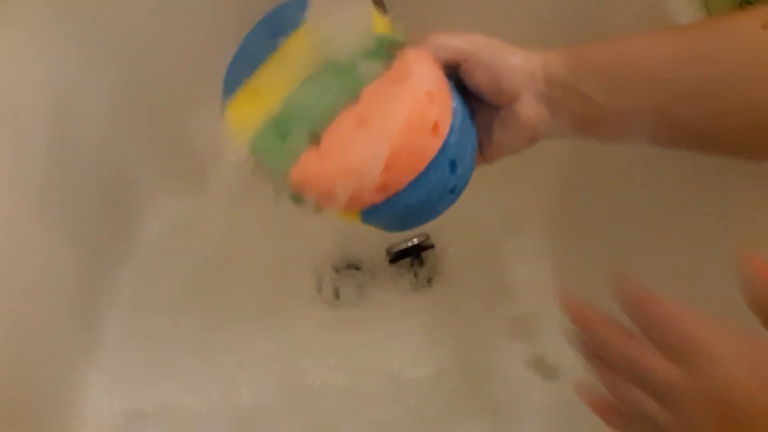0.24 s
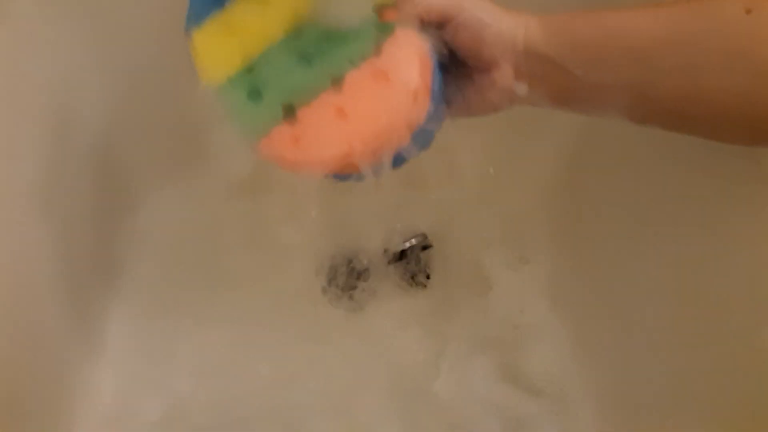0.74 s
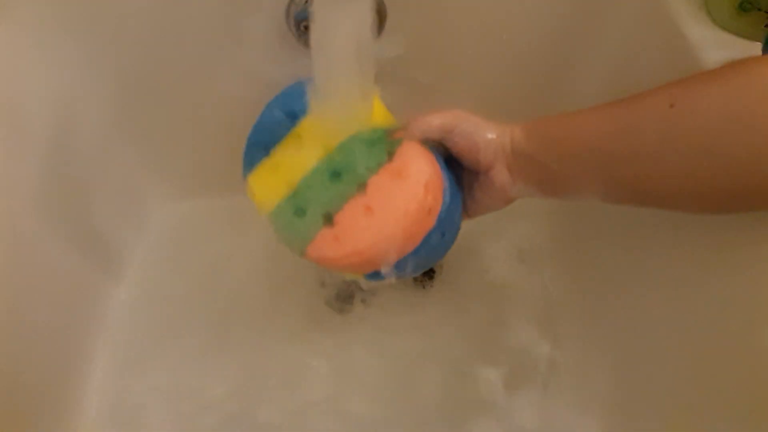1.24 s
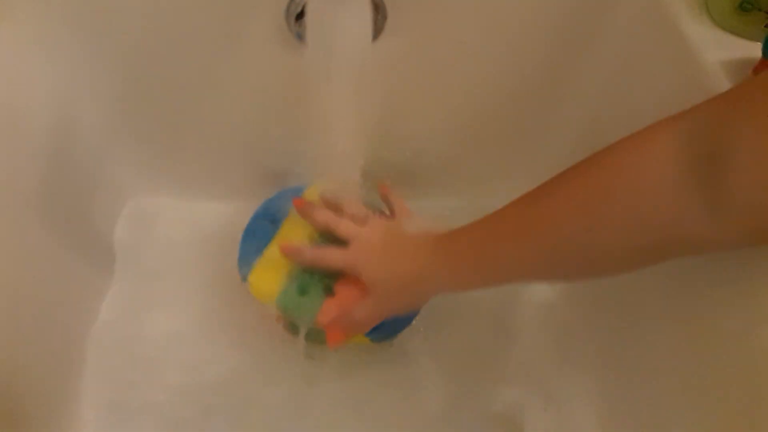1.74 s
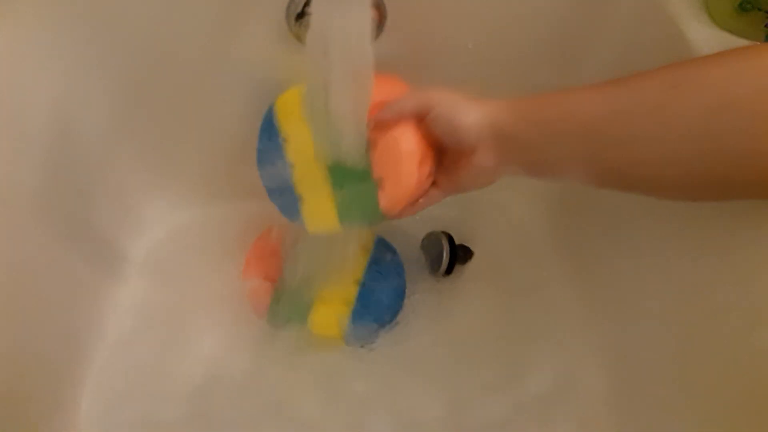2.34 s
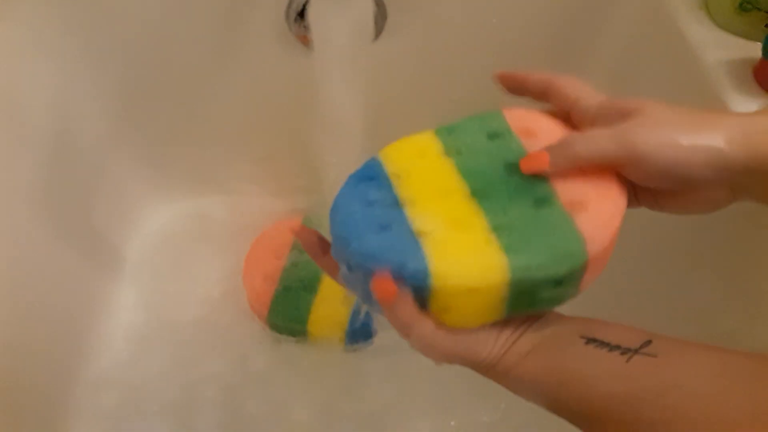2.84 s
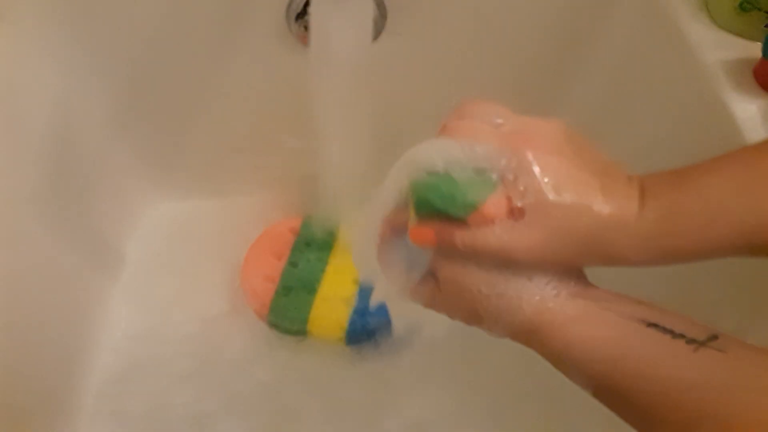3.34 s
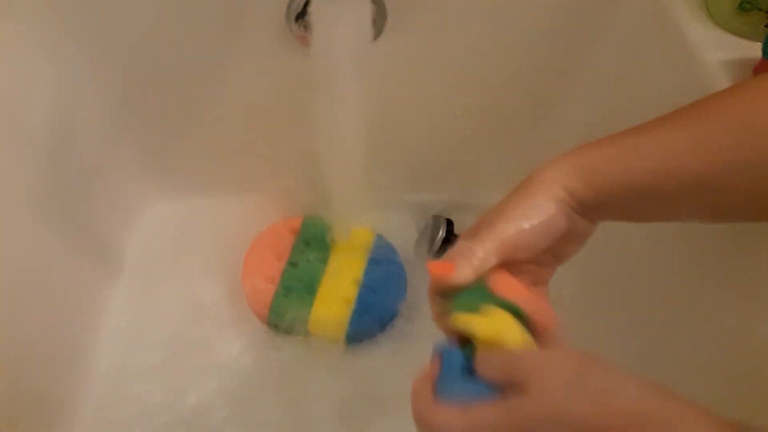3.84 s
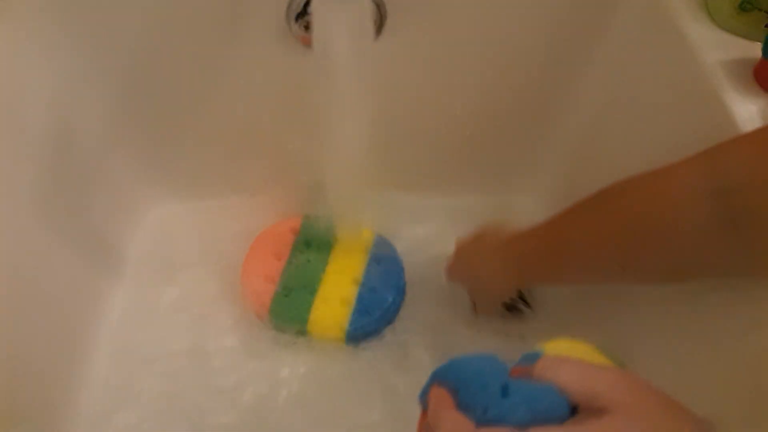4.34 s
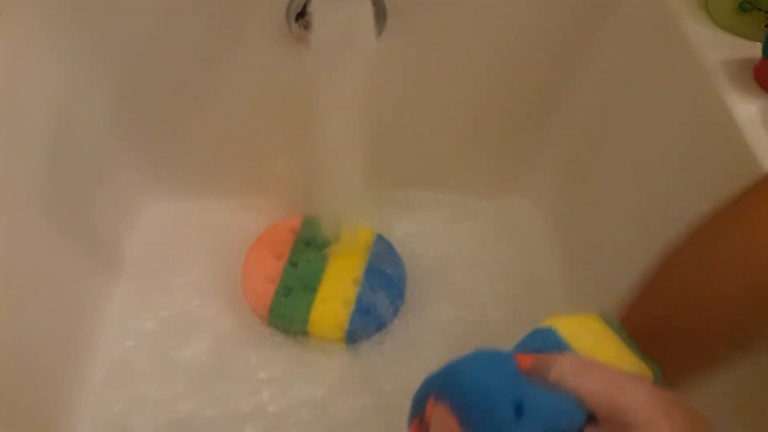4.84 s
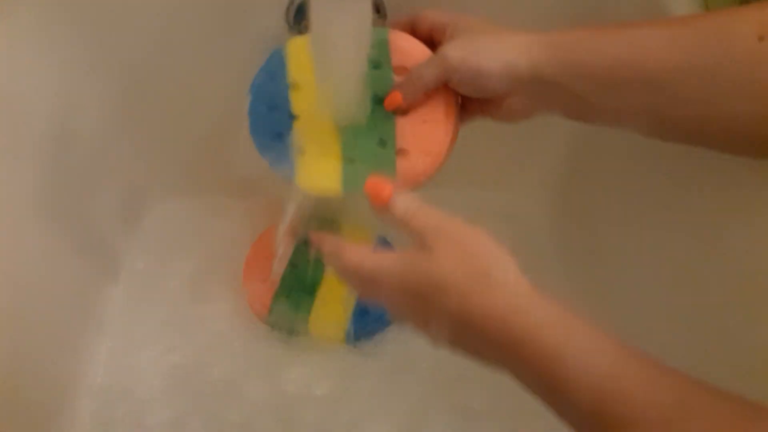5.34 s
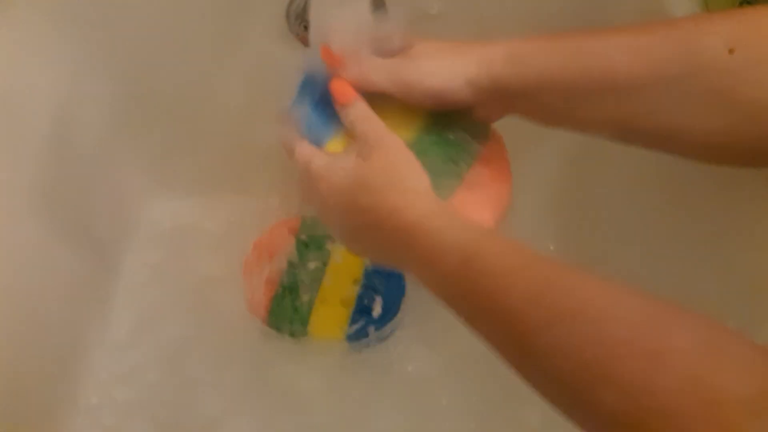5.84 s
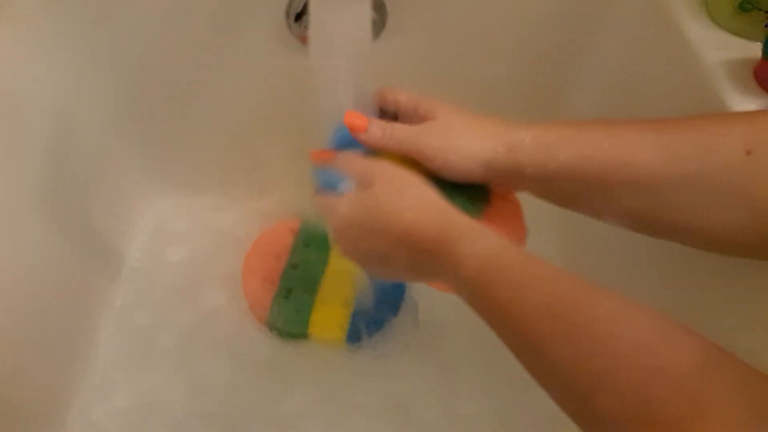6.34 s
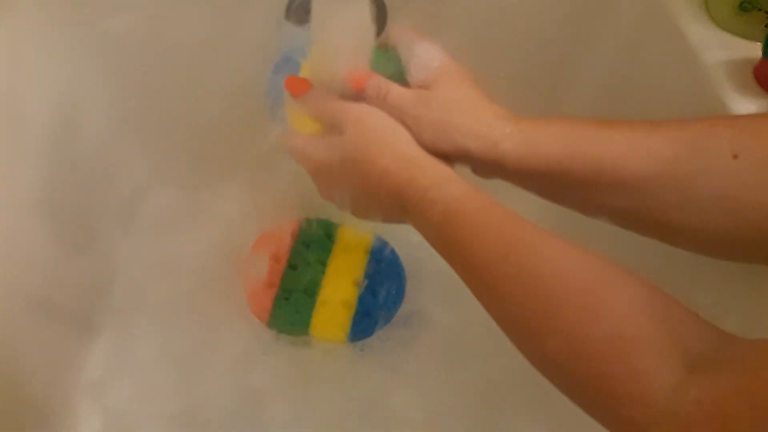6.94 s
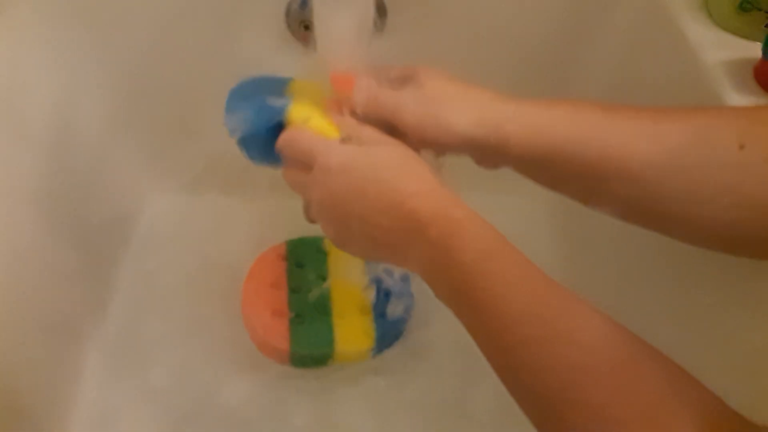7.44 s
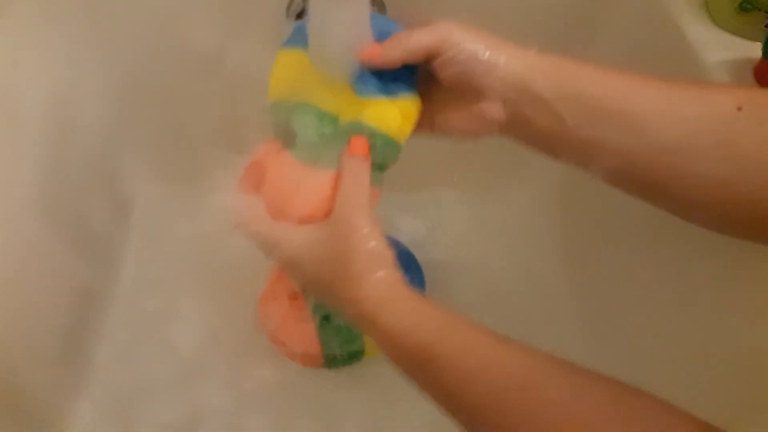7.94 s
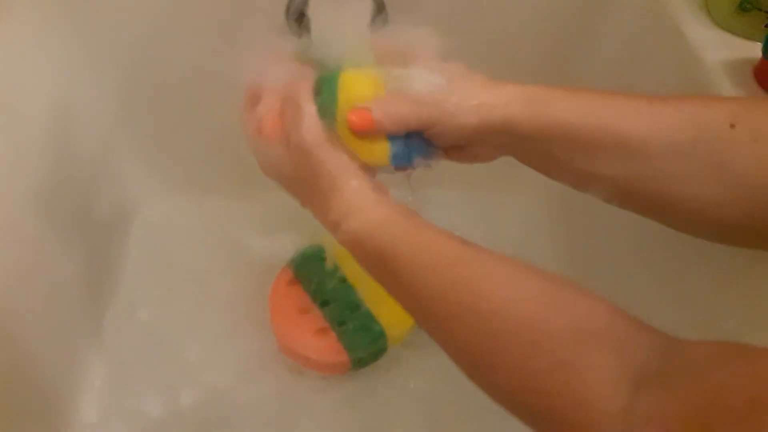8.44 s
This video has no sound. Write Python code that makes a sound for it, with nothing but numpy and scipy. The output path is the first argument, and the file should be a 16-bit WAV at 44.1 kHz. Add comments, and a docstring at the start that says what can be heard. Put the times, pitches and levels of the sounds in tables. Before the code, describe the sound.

Water runs from a tap into a bathtub, spattering over hands and squeezed sponges in a small bathroom; something knocks once against the tub.

```python
"""A running bath tap: turbulence excites the resonances of the spout, and the jet drives the modes of
the shallow-filled tub. Hands turn and squeeze sponges under the jet, so spray (droplet impacts) and
gurgle (oscillating bubbles) come and go. Once something hard, like a drain stopper, strikes the tub
and rebounds. The small hard-walled bathroom reverberates."""
import sys
import numpy as np
from scipy import signal
from scipy.fft import rfft, irfft, next_fast_len
from scipy.io import wavfile
from scipy.ndimage import uniform_filter1d, map_coordinates

SR = 44100
rng = np.random.default_rng(int(sys.argv[2]) if len(sys.argv) > 2 else 0)


def write(x):
    x = np.atleast_2d(x).T
    wavfile.write(sys.argv[1], SR, np.round(np.clip(x, -1, 1) * 32767).astype(np.int16))


N = 383669


# loudness of the running tap, which ducks after the knock and then recovers: t/s, level/dB
TAP_LEVEL = [(0.0, -26.5), (0.4, -27), (1.7, -26.5), (2.0, -27), (3.2, -26.5), (4.1, -27.5), (4.7, -27.0),
             (5.0, -30), (5.4, -29.5), (7.1, -26.5), (7.2, -28), (7.4, -24.5), (7.5, -26.5), (7.8, -25.5),
             (8.1, -26.5), (8.7, -26)]
# spout resonances: f/Hz, bandwidth/Hz, level/dB
SPOUT_MODES = [(786, 21, -12), (870, 32, -5), (994, 22, -8.5), (1086, 14.4, 2.1), (1150, 15, -9),
               (1172.3, 16.7, 4), (1204, 13, 3.5), (1253, 14, -5.5), (1251, 11, 3), (1326, 23, -7),
               (1390, 65, -15.5), (1904, 14, -8.5), (2120, 100, -31.5)]
# continuum beneath them: f/Hz, level/dB
SPOUT_FLOOR = [(20, -60), (400, -40), (1500, -16), (2500, -31.5), (5000, -32), (16000, -70)]
def spout(tap_db):
    """Resonance: the turbulent, sputtering flow sings at the natural frequencies of the spout."""
    sputter = amp(1.6 * wobble(50))
    return amp(tap_db + 1.23 + 1.03 * wobble(8)) * sputter * resonant(SPOUT_MODES, SPOUT_FLOOR)


# upper spout resonances: f/Hz, bandwidth/Hz, level/dB
HISS_MODES = [(3331, 45, 5.5), (3564, 47, 0.5), (3640, 28, -13), (3780, 54, 3), (4040, 40, -4.5),
              (4470, 88, -3), (4660, 61, -1.5), (6290, 28, 1)]
# rush of the aerated jet: f/Hz, level/dB
RUSH = [(20, -60), (1000, -29), (2000, -13.5), (2500, -12), (3200, -5.5), (4200, -7.5), (5100, -7.5),
        (6600, -9), (7700, -14), (11000, -21.5), (16000, -18.5)]
def hiss(tap_db, break_db):
    """Turbulent noise: the hiss follows the tap's loudness and weakens as the jet spills or soaks in."""
    lost_db = 0.32 * np.maximum(break_db, 0) + 0.67 * np.maximum(-break_db, 0)
    gain = amp(tap_db + 2.5 - lost_db + 0.71 * wobble(20))
    return gain * patchy(resonant(HISS_MODES, RUSH), depth_db=2.23)


# loudness of the tub's low drumming, ducking for a moment after the knock: t/s, level/dB
DRUM_LEVEL = [(0.0, -33), (0.4, -35.5), (0.6, -33.5), (0.8, -35.0), (3.4, -34.5), (4.4, -37.5),
              (4.5, -33.5), (4.6, -37.5), (5.0, -36.0), (5.2, -38.5), (5.3, -36.5), (5.8, -38.5),
              (6.5, -36), (8.7, -34.5)]
# modes of the shell and its hollow: f/Hz, bandwidth/Hz, level/dB
TUB_MODES = [(66, 16, -25), (107, 12, -31), (154.7, 5.9, -7), (169.6, 10.8, -7), (206, 12, -11),
             (231, 5.5, -4.5), (263.6, 6.3, 4.5), (281, 18, -5.5), (312.4, 8.8, -0.5), (323, 10, -5),
             (428, 30, -6.5), (499, 12, -12), (542, 15, -5), (597, 18, -5.5), (688, 12.3, -6.5)]
# continuum beneath them: f/Hz, level/dB
TUB_FLOOR = [(20, -35), (100, -44), (200, -24), (500, -43), (900, -19), (2000, -58), (16000, -90)]
def drumming():
    """Forced vibration: the jet drives the modes of the tub with a random force."""
    return amp(curve(DRUM_LEVEL) + 2.5 + 0.86 * wobble(22)) * resonant(TUB_MODES, TUB_FLOOR)


# the jet slips off the sponge onto hands and pool: t/s, duration/s, spray rise/dB
SPILLS = [(0.55, 0.073, 3), (1.05, 0.34, 3), (1.53, 0.16, 6.5), (1.74, 0.53, 6), (2.39, 0.2, 4.5),
          (2.82, 2.514, 7), (6.18, 0.4, 5.5), (7.11, 0.028, 6.5), (8.25, 0.045, 5)]
# the sponge swallows the jet: t/s, duration/s, spray fall/dB
SOAKS = [(1.46, 0.034, 2.5), (2.69, 0.086, 1.5), (5.36, 0.15, 2.5), (5.7, 0.4, 1.5), (7.6, 0.091, 3)]
def break_up():
    """Jet break-up: the spray level in dB relative to a jet running over the sponge."""
    def moves(rows):
        return sum(db * gesture(s, length, attack=.02, release=.037) for s, length, db in rows)
    return moves(SPILLS) - moves(SOAKS)


# spectrum of droplet impacts: f/Hz, level/dB
FIZZ = [(55, -53), (100, -11), (170, -17), (700, -23), (1500, -24.5), (2500, -8), (3400, -3.5), (5100, -5),
        (6600, -0.5), (7200, -3.5), (7700, -8.5), (12100, -7), (12800, -11), (16000, -16)]
def spray(spray_db):
    """Impact and air entrainment: droplets click in bursts, and many trap a pinging bubble."""
    clicks = (rng.random((2, N)) < 9000 / SR) * rng.standard_normal((2, N))
    patter = unit(clicks) * bursts(rate=420, spread_db=4.2, t60=.036) * amp(spray_db + 7)
    patter = scattered(patter, tub_db=-6, room_db=-1, tub_t60=.015, room_t60=0.25)
    patter = patchy(patter, depth_db=1.6)
    pings = np.array([bubbles(rate=450, band_hz=(3500, 15000), cycles=13, spread_db=3.6, samples=650)
                      for channel in range(2)])
    return stereo(filtered(patter + pings * amp(spray_db - 3), lambda hz: amp(along(FIZZ, hz) + 1.5)))


def ticks(spray_db):
    """Direct sound: nearby drops land as dry, heavily damped ticks."""
    pair = np.array([bubbles(rate=90, band_hz=(5000, 14000), cycles=2.5, spread_db=3, samples=200)
                     for channel in range(2)])
    return stereo(pair * amp(spray_db - 14))


# water pressed from a sponge: t/s, duration/s, large-bubble level/dB, small-bubble level/dB
SQUEEZES = [(-0.05, 0.11, -28, -30), (0.218, 0.46, -34.5, -30.5), (0.997, 0.59, -30.5, -35.5),
            (1.9, 0.21, -32.5, -42), (2.5, 0.2, -48, -34), (3.113, 0.38, -36, -36), (4.52, 0.36, -63, -37),
            (6.038, 0.082, -33, -28.5), (6.836, 0.037, -33, -27.5), (7.114, 0.47, -31.5, -32),
            (7.72, 0.089, -32.5, -44), (8.415, 0.18, -29.5, -33)]
def gurgle():
    """Bubble resonance: jet and runoff drive air into the pool; larger bubbles ring lower."""
    large = runoff([(s, length, db) for s, length, db, _ in SQUEEZES], churn_db=-41.5)
    small = runoff([(s, length, db) for s, length, _, db in SQUEEZES], churn_db=-33.5)
    large *= bubbles(rate=450, band_hz=(334, 932), cycles=4.34, spread_db=2.5, samples=1700)
    small *= bubbles(rate=1100, band_hz=(1693, 3480), cycles=4.4, spread_db=5, samples=450)
    return amp(-3) * bathroom(large + small, tub_db=-2, room_db=-3.5)


def runoff(squeezes, churn_db):
    """Incoherent addition: the jet's churning and each squeeze sum in power to a bubble cloud's gain."""
    swells = sum((amp(db) * gesture(s, length, attack=.024, release=.14)) ** 2
                 for s, length, db in squeezes)
    return np.sqrt(amp(2 * churn_db) + swells) * amp(0.8 * wobble(12))


# air pockets: t/s, level/dB, f/Hz
PLOPS = [(0.084, -13, 696), (1.358, -14, 522), (7.444, -14, 504), (8.595, -12, 770)]
def plops():
    """Damped pulsation: air pockets close under the hands and ring dully."""
    track, t = np.zeros(N), np.arange(SR // 8) / SR
    for s, db, hz in PLOPS:
        add(track, s, amp(db - 1.5) * bubble(t, hz, cycles=3))
    return track


# the fattest drops: t/s, level/dB, f/Hz
SPLATS = [(0.2542, -7, 2550), (1.5224, -7, 3800), (1.8247, -2, 4620), (2.0666, -4, 3840), (3.1727, 1, 6660),
          (3.9289, -0.5, 4600), (4.0965, 0, 6600), (4.972, -2, 3840), (5.0454, -4, 4430),
          (5.8295, -3.5, 6000), (6.4087, -3, 4800), (6.5756, 0, 4300)]
def splats(spray_db):
    """Impact transients: each drop slaps, rings briefly and leaves three pinging bubbles."""
    track, t = np.zeros(N), np.arange(SR // 8) / SR
    for s, db, hz in list(SPLATS) + lesser_drops(spray_db):
        slap = .35 * np.gradient(rng.standard_normal(len(t))) * amp(-60 * t / .012)
        add(track, s, amp(db - 3) * (bubble(t, hz, cycles=3) + slap))
        for delay, detune in rng.random((3, 2)):
            add(track, s + .01 * delay, amp(db - 11) * bubble(t, hz * 2 ** (detune - .5), cycles=5.9))
    return track


def lesser_drops(spray_db, rate=3.5, low_hz=4530, high_hz=11200, spread_db=5):
    """Random arrivals: drops scale with the spray that throws them; rows of t/s, level/dB, f/Hz."""
    when, size, pitch = rng.random((int(rate * N / SR), 3)).T
    db = spray_db[(when * N).astype(int)] + 19.5 + spread_db * (2 * size - 1)
    return list(zip(when * N / SR, db, low_hz * (high_hz / low_hz) ** pitch))


# the stopper's contacts: t/s, level/dB, brightness/dB
KNOCKS = [(4.802, -26, 15), (4.8098, -7, 0), (4.818, -13.5, -5), (4.863, -12.5, -5), (4.872, -13.5, -6)]
# modes of stopper and tub wall: f/Hz, level/dB, T60/s
STOPPER_MODES = [(121, -35, .15), (265, -15.5, 0.094), (345, -7, 0.042), (510, -15, 0.028),
                 (673, -1.5, 0.029), (785, -2, 0.022), (1830, -9, .025), (2830, 0, 0.0082),
                 (3030, -1, 0.023), (3630, 1, 0.012)]
def stopper():
    """Free vibration after impact: a faint bright tick, the main knock, then duller bounces."""
    track, t = np.zeros(N), np.arange(SR // 4) / SR
    for s, db, bright_db in KNOCKS:
        ring = np.zeros(len(t))
        for hz, mode_db, t60 in STOPPER_MODES:
            struck_db = mode_db + bright_db * (hz > 1500) + rng.normal(0, 1.4)
            onset = 1 - np.exp(-2 * t * hz)
            ring += amp(struck_db - 60 * t / t60) * np.sin(2 * np.pi * hz * t) * onset
        crack = 0.83 * np.gradient(rng.standard_normal(len(t))) * amp(-60 * t / .005)
        add(track, s, amp(db) * (ring + crack))
    return bathroom(track, tub_db=1, room_db=-2)


def resonant(modes, floor):
    """Random excitation: stereo turbulence rings in resonances over a broad floor, rms 1."""
    def response(f):
        peaks = sum(amp(2 * db) * (f * width) ** 2 / ((hz * hz - f * f) ** 2 + (f * width) ** 2)
                    for hz, width, db in modes)
        return np.sqrt(peaks + amp(2 * along(floor, f)))
    return unit(stereo(filtered(rng.standard_normal((2, N)), response)))


def bubble(t, hz, cycles, rise=0.11):
    """Damped oscillator: a bubble decays by 1/e in `cycles`, rising in pitch as it nears the surface."""
    age = t * hz / cycles
    return np.sin(2 * np.pi * hz * t * (1 + rise * age / 4)) * np.exp(-age) * (1 - np.exp(-2 * t * hz))


def bubbles(rate, band_hz, cycles, spread_db, samples):
    """Superposition: `rate` bubbles a second of random moment, pitch and strength, rms 1."""
    when, pitch, strength = rng.random((int(rate * N / SR), 3), dtype=np.float32).T[:, :, None]
    low_hz, high_hz = band_hz
    hz = low_hz * (high_hz / low_hz) ** pitch
    k = np.arange(samples)
    rings = amp(-spread_db * np.log(0.01 + strength)) * bubble(k.astype(np.float32) / SR, hz, cycles)
    positions = (when * N).astype(int) + k
    return unit(np.bincount(positions.ravel(), rings.ravel(), N)[:N])


def patchy(x, depth_db):
    """Band modulation: drops of like size come in swarms, so neighbouring pitches swell together."""
    spectrum = signal.stft(x, nperseg=256)[2]
    swarms = uniform_filter1d(rng.standard_normal(spectrum.shape[1:]), size=6, axis=0)
    swarms = uniform_filter1d(swarms, size=7, axis=1)
    return signal.istft(spectrum * unit(amp(depth_db * unit(swarms))), nperseg=256)[1][:, :N]


def bursts(rate, spread_db, t60):
    """Shot noise: the envelope of many little splashes, each sudden and then decaying, rms 1."""
    starts = rng.random(N) < rate / SR
    energy = amp(2 * spread_db * np.minimum(rng.standard_normal(N), 2.2))
    power = signal.lfilter([1], [1, -amp(-120 / (t60 * SR))], starts * energy)
    return unit(np.sqrt(power))


def scattered(x, tub_db, room_db, tub_t60, room_t60):
    """Diffuse field: echoes of drops all over the tub sum to a noise that follows the decaying power."""
    t = np.arange(SR // 2) / SR
    early, late = amp(-120 * t / tub_t60), amp(-120 * t / room_t60)
    decay = amp(2 * tub_db) * early / early.sum() + amp(2 * room_db) * late / late.sum()
    power = np.abs(signal.fftconvolve(np.mean(x ** 2, axis=0), decay)[:N])
    return (x + np.sqrt(power) * rng.standard_normal((2, N))) / np.sqrt(1 + decay.sum())


# reverberation time of the bathroom: f/Hz, T60/s
ROOM_T60 = [(150, 0.06), (1000, 0.37), (4000, 0.28), (14000, 0.093)]
def bathroom(x, tub_db, room_db, tub_t60=0.043):
    """Reverberation: direct sound, early reflections in the tub and the room's tail, at constant power."""
    hz, t, spectrum = signal.stft(rng.standard_normal((2, SR // 2)), SR, nperseg=256)
    tail = signal.istft(spectrum * amp(-60 * t / along(ROOM_T60, hz)[:, None]), SR, nperseg=256)[1]
    t = np.arange(tail.shape[1]) / SR
    tail *= 1 - np.exp(-t / 0.0021)
    early = rng.standard_normal(tail.shape) * (rng.random(tail.shape) < .06) * amp(-60 * t / tub_t60)
    response = amp(room_db) * tail / np.linalg.norm(tail) + amp(tub_db) * early / np.linalg.norm(early)
    response[0, 0] += 1  # direct sound
    return stereo(signal.fftconvolve(x[None], response / np.linalg.norm(response), axes=1)[:, :N])


# width of the sound field: f/Hz, side minus mid level/dB
WIDTH = [(60, -22), (110, -31), (200, -20.5), (380, -5.5), (700, -7), (1290, -2.5), (2380, -1), (4400, -1),
         (8120, 0.5), (15000, -1)]
def stereo(pair):
    """Spatial coherence: mid and side become left and right; long waves reach both alike."""
    mid, side = filtered(pair, lambda hz: np.array([np.ones_like(hz), amp(along(WIDTH, hz))]))
    return np.array([mid + side, mid - side])


def amp(db):
    """Decibels to gain."""
    return 10 ** (np.asarray(db) / 20)


def unit(x):
    """Scale to rms 1."""
    return x / np.sqrt(np.mean(x ** 2) + 1e-20)


def along(points, hz):
    """Interpolate (f/Hz, value) points on a log axis."""
    f, values = np.transpose(points)
    return np.interp(np.log(hz + 1), np.log(f), values)


def curve(points):
    """Interpolate (t/s, value) points at every sample."""
    return np.interp(np.arange(N) / SR, *np.transpose(points))


def wobble(rate):
    """A smooth random curve, `rate` knots a second."""
    return map_coordinates(rng.standard_normal(int(N * rate / SR) + 4), [np.arange(N) * rate / SR])


def gesture(start, length, attack, release):
    """Trapezoidal envelope of a hand movement, 0 to 1; times in s."""
    t = np.arange(N) / SR
    return np.clip(np.minimum((t - start) / attack, 1 - (t - start - length) / release), 0, 1)


def filtered(x, response):
    """Multiply the spectrum by a frequency response."""
    size = next_fast_len(N + SR // 2)
    return irfft(rfft(x, size) * response(np.fft.rfftfreq(size, 1 / SR)), size)[..., :N]


def add(track, s, sound):
    """Mix a sound into a track at time s."""
    part = track[round(s * SR):][:len(sound)]
    part += sound[:len(part)]


def scene():
    """Superposition of all sources; the spray follows the jet's break-up and the tap's loudness."""
    tap_db, break_db = curve(TAP_LEVEL), break_up()
    spray_db = -32 + break_db + 0.68 * (tap_db - tap_db.mean()) + .5 * wobble(12)
    jet = spout(tap_db) + hiss(tap_db, break_db) + drumming()
    water = spray(spray_db) + ticks(spray_db) + gurgle()
    splashes = bathroom(plops() + splats(spray_db), tub_db=0.5, room_db=-1)
    return jet + water + splashes + stopper()


# channel balance: f/Hz, left minus right level/dB
BALANCE = [(60, -2), (110, 1), (200, -0.5), (380, -0.5), (700, 0), (1290, 1.5), (2380, -0.5), (4400, -0.5),
           (8120, 0.0), (15000, 0.5)]
def record(dry, top_hz=15800):
    """Linear filtering: left and right differ slightly in colour; nothing passes the band limit."""
    return filtered(dry, lambda hz: amp(np.outer([.5, -.5], along(BALANCE, hz))) * (hz < top_hz))


dry = scene()
out = record(dry)
write(out)
```